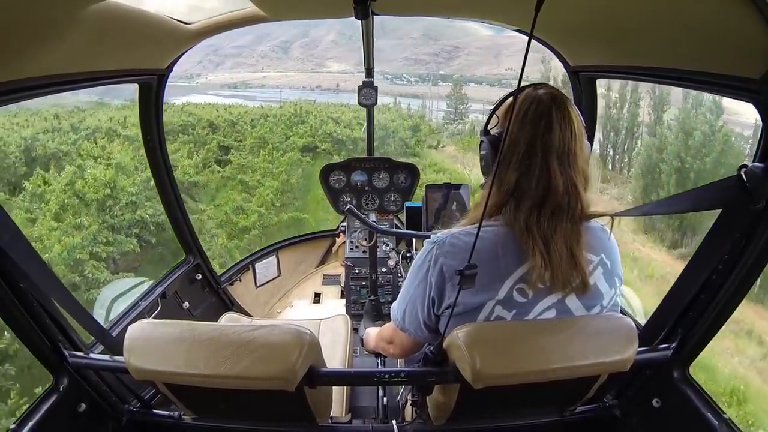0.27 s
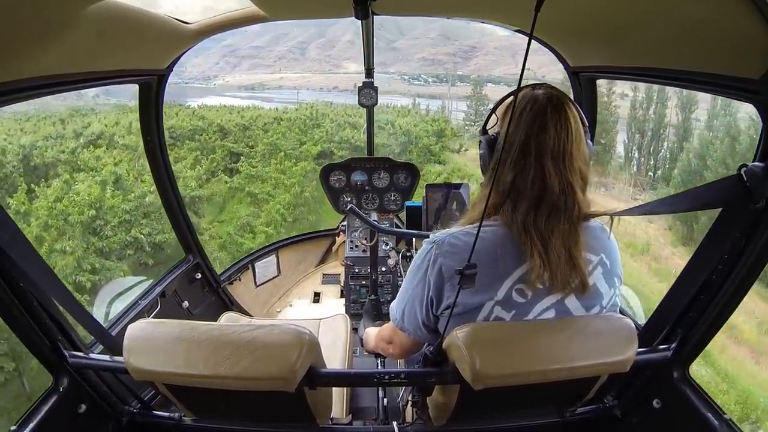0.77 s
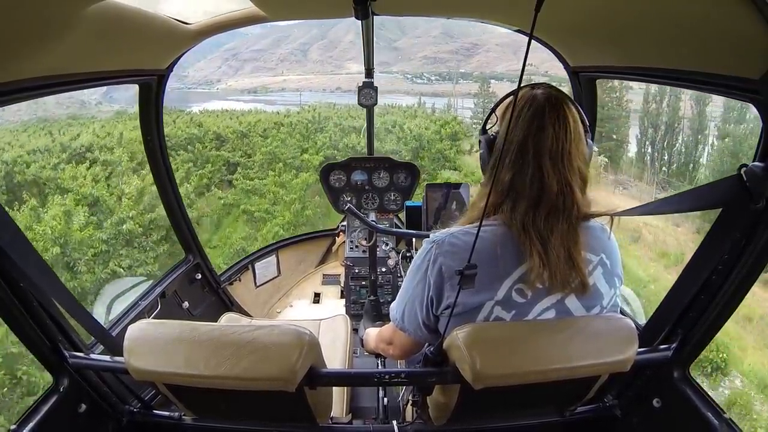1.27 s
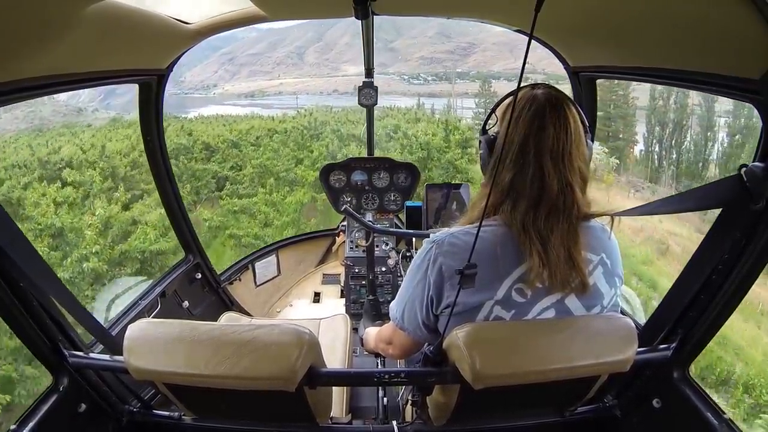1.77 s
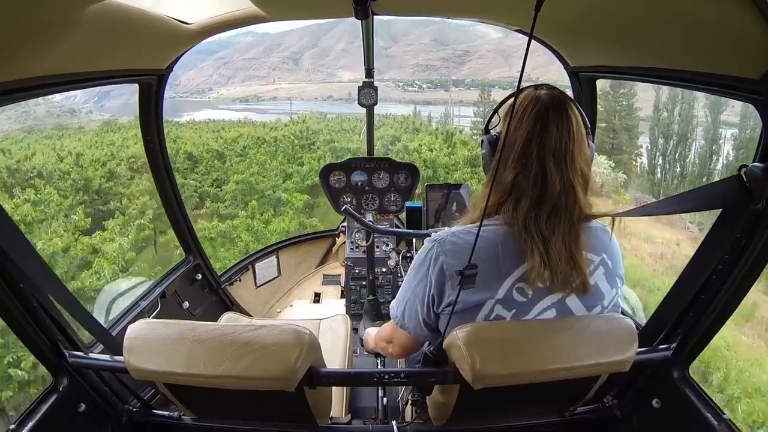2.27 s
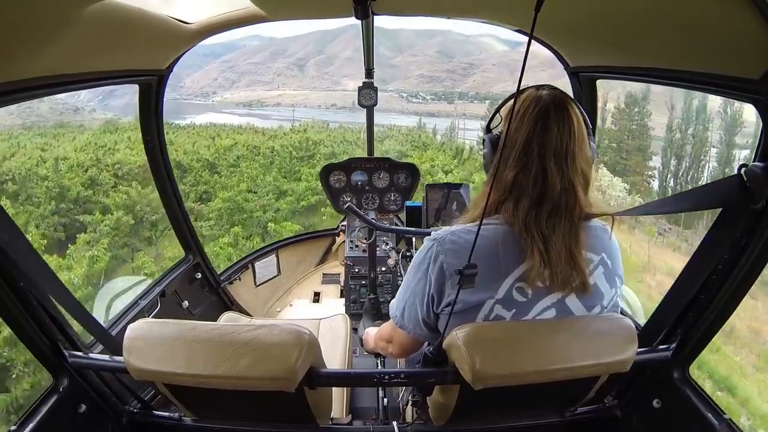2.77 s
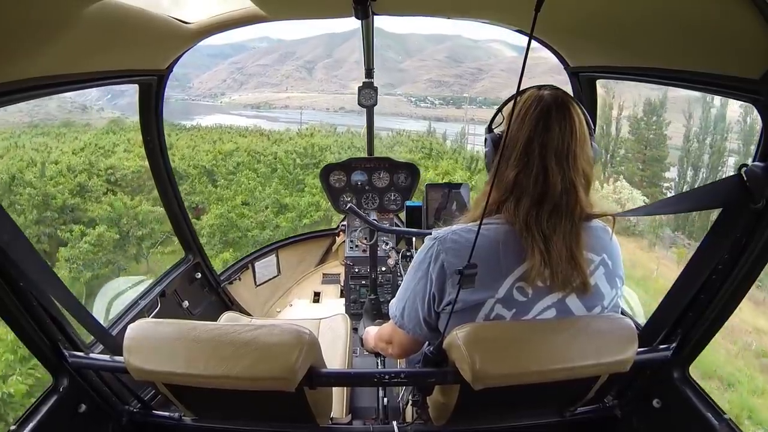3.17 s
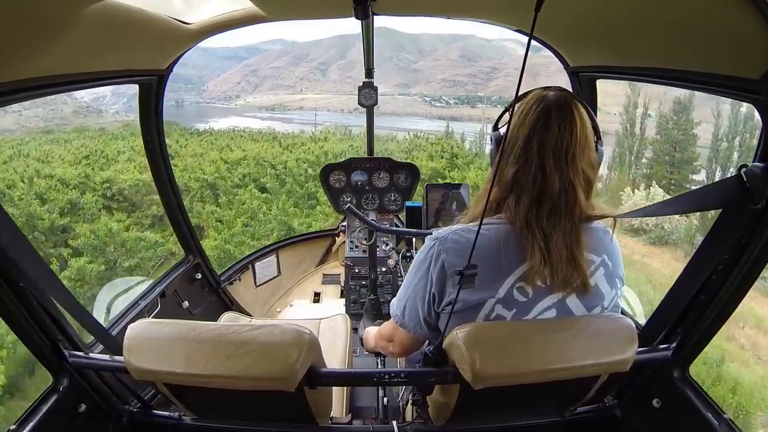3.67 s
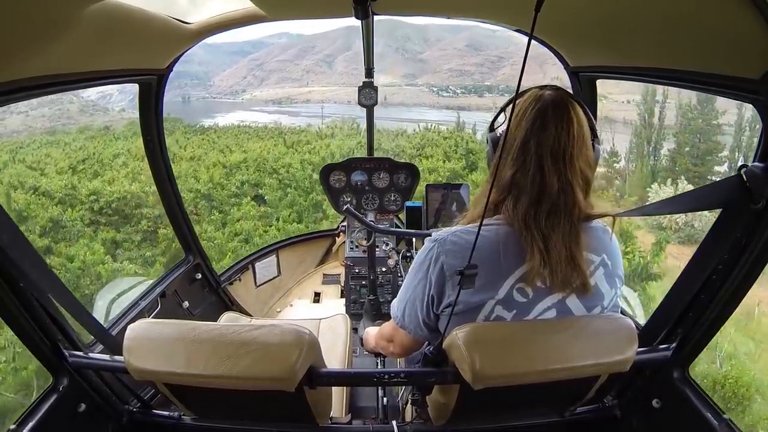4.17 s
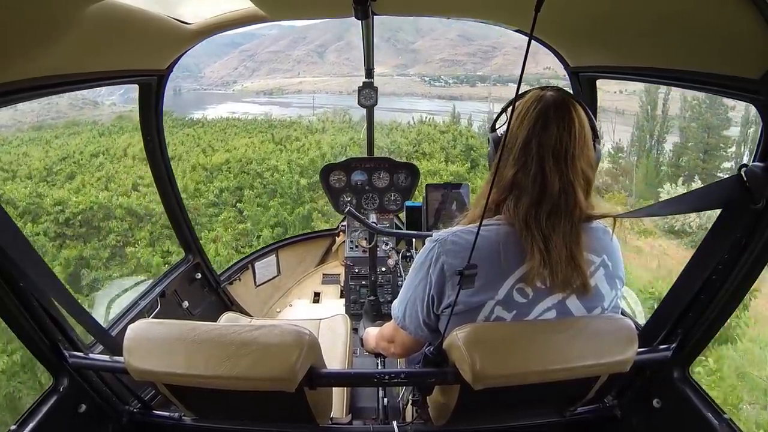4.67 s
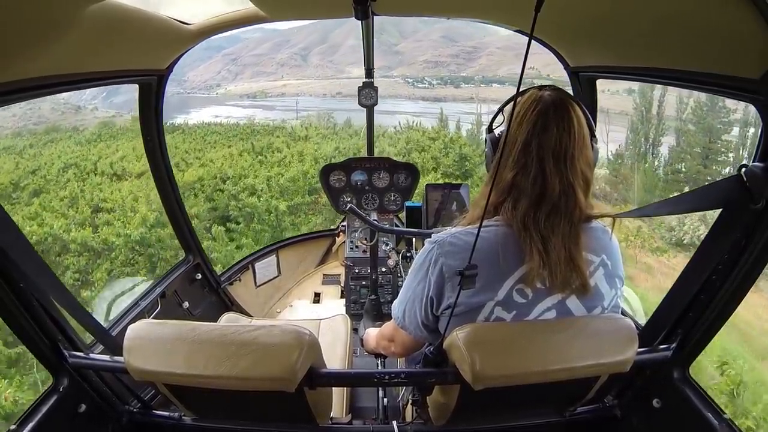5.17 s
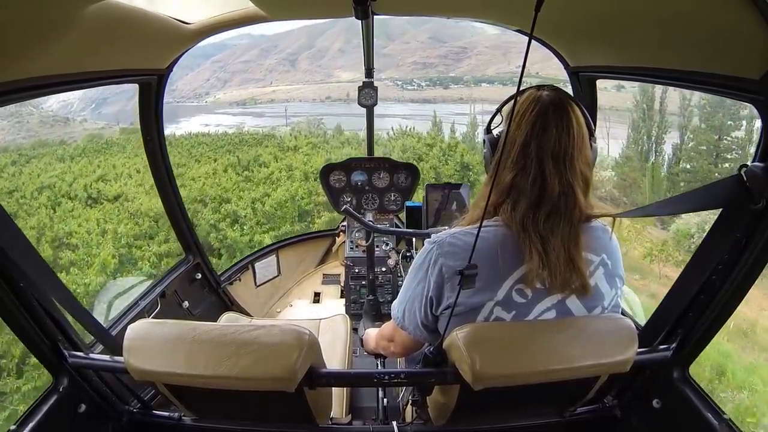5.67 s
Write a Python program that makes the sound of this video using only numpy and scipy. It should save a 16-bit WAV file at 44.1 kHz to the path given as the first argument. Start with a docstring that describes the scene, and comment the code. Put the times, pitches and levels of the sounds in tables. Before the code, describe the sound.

A small piston helicopter in flight, taken through a cable in the cabin. A steady low electrical buzz leads over engine drone, muffled roar and wide even hiss, with a faint high gear whine. A soft knock comes at the start, then sparse dry static clicks; knocks and clicks bunch up in the last second. Almost identical left and right, with no room echo.

```python
"""Inside a small piston helicopter, heard through a cable. From the start an electrical buzz of locked overtones lies
over engine lines, a gear whine and noise-made cabin roar; filtered noise adds hiss and drift to a constant offset.
A panel resonance rings throughout and is knocked from 0.1 s on; the 800 Hz band swells irregularly from 0.2 s.
Static clicks, filtered impulses, snap from 0.5 s; knocks and clicks crowd together in the last second."""
import sys
import numpy as np
from scipy.fft import rfft, irfft, next_fast_len
from scipy.io import wavfile
from scipy.ndimage import map_coordinates

SR = 44100
rng = np.random.default_rng(int(sys.argv[2]) if len(sys.argv) > 2 else 0)


def to_wav(s):
    """Save 16-bit WAV."""
    ch = np.atleast_2d(s).T  # columns
    pcm = np.round(np.clip(ch, -1, 1) * 32767)  # PCM
    wavfile.write(sys.argv[1], SR, pcm.astype(np.int16))


N = 260631
CYCLE_HZ = 22.81  # four-stroke engine cycle


def amp(db):
    """Decibels to gain."""
    return 10 ** (np.asarray(db) / 20)


def unit(x):
    """Scaled to rms 1."""
    return x / np.sqrt(np.mean(x ** 2))


def curves(rows):
    """One value per sample for each column after the time."""
    s, *cols = np.transpose(rows)
    return [np.interp(np.arange(N) / SR, s, c) for c in cols]


def wobble(rate_hz):
    """A smooth random curve through rate_hz knots a second."""
    knots = rng.standard_normal(int(N * rate_hz / SR) + 4)
    return map_coordinates(knots, [np.arange(N) * rate_hz / SR])


def filtered(x, response):
    """x passed through a complex response of frequency."""
    m = next_fast_len(N + SR // 2)
    spectrum = rfft(x, m) * response(np.fft.rfftfreq(m, 1 / SR))
    return irfft(spectrum, m)[..., :N]


def resonance(hz, width_hz):
    """A causal resonant peak of gain 1."""
    return lambda f: 1j * f * width_hz / (hz ** 2 - f ** 2 + 1j * f * width_hz)


def noise(spectrum, channels=1):
    """Noise whose density follows (Hz, dB per Hz) points on a log axis, at -140 dB per Hz above them."""
    hz, db = np.transpose(spectrum)
    gain = lambda f: amp(np.interp(np.log(f + 1), np.log(hz + 1), db, right=-140))
    white = rng.standard_normal((channels, N)) * np.sqrt(SR / 2)
    return filtered(white, gain)


def tone(hz, db, phase=None):
    """A sine of rms db that follows hz, starting anywhere unless a phase is given."""
    phase = rng.uniform(0, 2 * np.pi) if phase is None else phase
    turns = np.cumsum(hz + np.zeros(N)) / SR
    return np.sqrt(2) * amp(db) * np.sin(2 * np.pi * turns + phase)


def kicks(rows):
    """One impulse for each (s, dB) row."""
    train = np.zeros(N)
    s, db = np.transpose(rows)
    train[np.round(s * SR).astype(int)] = amp(db)
    return train


def roar():
    """Turbulent cabin noise that swells in lumps."""
    # Density before the lumps. Each row: frequency in Hz, level in dB per Hz.
    roar_spectrum = [(40, -100), (110, -84), (190, -82), (250, -76.5), (300, -74), (370, -78.5), (410, -75),
                     (460, -76), (560, -82), (670, -81), (730, -85), (1000, -91), (2500, -100)]
    lumps_db = 0.68 * wobble(12) + 0.87 * wobble(40)
    return noise(roar_spectrum)[0] * amp(lumps_db)


def whine():
    """Gear teeth sing one wandering line; a few faint tones stand still."""
    # Mean gear pitch. Each row: time in seconds, frequency in Hz.
    gear_pitch = [(0, 2660), (1.1, 2659), (2, 2649), (2.8, 2646), (3.6, 2655), (4.4, 2663), (5, 2657),
                  (5.91, 2648)]
    # Faint steady tones. Each row: frequency in Hz, rms level in dB.
    steady_tones = [(243.5, -68), (460, -65), (1616.3, -80), (1636.5, -81)]
    gear_db, waver_hz = -73, 4
    hz, = curves(gear_pitch)
    gear = tone(hz + waver_hz * wobble(8), gear_db + 3.5 * wobble(6.6))
    return gear + sum(tone(*row) for row in steady_tones)


def engine():
    """Uneven cylinders give a line at each multiple of the cycle; the governor hunts slightly."""
    # Lines that reach the cabin. Each row: multiple of the cycle, mean level in dB rms.
    cycle_lines = [(5, -77), (6, -68), (9, -69), (11, -71), (12, -67), (13, -66), (15, -62), (16, -70),
                   (17, -70), (19, -61), (20, -69), (22, -70), (24, -74), (26, -77), (30, -79)]
    cycle_hz = CYCLE_HZ * (1 + 0.00067 * wobble(1.56))
    return sum(tone(k * cycle_hz, db + 1.1 * wobble(2.88)) for k, db in cycle_lines)


def panel():
    """A panel resonance driven by noise that pulses at the engine cycle, and by soft knocks."""
    # Panel resonance: frequency in Hz, width in Hz.
    panel_peak = (816, 74)
    # Soft knocks. Each row: time in seconds, impulse level before filtering in dB.
    knock_rows = [(.1042, 0), (1.2865, -8), (5.196, -6), (5.5032, 1.5), (5.58, -6), (5.754, -7), (5.81, -7)]
    shaken_db, cycle_shake_db = -60.5, 3
    ring, thud = resonance(*panel_peak), resonance(800, 500)
    cycle = np.sin(2 * np.pi * CYCLE_HZ * np.arange(N) / SR)
    shake_db = 0.99 * wobble(29.96) + cycle_shake_db * cycle
    shaken = filtered(rng.standard_normal(N) * amp(shake_db), lambda f: ring(f) ** 1.66)
    soft_knock = lambda f: (ring(f) + .35 * thud(f)) / (1 + (1j * f / 1100)) ** 2
    knocked = filtered(-kicks(knock_rows), soft_knock)
    return amp(shaken_db) * unit(shaken) + knocked


def clicks():
    """Each discharge pulls the line down for an instant, then kicks it up; the input rings briefly after it."""
    # Static clicks. Each row: time in seconds, impulse level before filtering in dB.
    click_rows = [(.52453, -7.8), (1.69047, -3.4), (2.79043, -5.3), (3.90637, -5.7), (4.52449, -4.2),
                  (4.82034, -3.3), (5.35489, -4.6), (5.40469, -4.2), (5.54761, -2.6), (5.83829, -4.1)]
    pull_lead_s, lowpass_hz = .00006, 2270
    pull = lambda f: 1 - .32 * np.exp(2j * np.pi * f * pull_lead_s)
    snap, after = resonance(1940, 3050), resonance(640, 185)
    click = lambda f: (pull(f) * snap(f) - .83 * after(f)) / (1 + 1j * f / lowpass_hz)
    return filtered(kicks(click_rows), click)


def buzz():
    """Overtones locked to one steady pitch, spread in phase so the pulse is smeared; their strength flutters."""
    # Overtones except the fifth. Each row: multiple of the pitch, mean level in dB rms.
    overtones = [(1, -66), (2, -47), (3, -50.5), (4, -58.5), (6, -79.5), (7, -77.5), (9, -82), (10, -76),
                 (14, -111), (15, -104), (20, -77)]
    # Listed swells of the narrow 800 Hz band, brief rises in the fifth overtone. Each row: peak time in
    # seconds, added peak level in dB rms.
    swells = [(.239, -54), (.328, -51), (.416, -51), (.633, -54), (.729, -73), (.895, -52), (.982, -56),
              (1.202, -67), (1.509, -51), (2.165, -48), (2.523, -50), (2.607, -52), (3.018, -46),
              (3.263, -53), (3.803, -53), (4.982, -53), (5.024, -54), (5.2, -50), (5.278, -49),
              (5.375, -51), (5.512, -52), (5.582, -49), (5.682, -55)]
    buzz_hz, fifth_db = 160.025, -59.5
    swell_s = 0.01  # from peak to 1/e
    flutter_db = .35 * wobble(25)  # common to all but the fifth
    smear = lambda k: 1.1 * k * k  # radians
    steady = sum(tone(k * buzz_hz, db + flutter_db + 0.84 * wobble(5.25), smear(k)) for k, db in overtones)
    t = np.arange(N) / SR
    swell_gain = sum(amp(db) * np.exp(-((t - s) / swell_s) ** 2) for s, db in swells)
    fifth_gain = amp(fifth_db + 1.5 * wobble(12)) + swell_gain
    fifth = tone(5 * buzz_hz, 0, smear(5) + .3 * wobble(20))
    return steady + fifth_gain * fifth


def scene():
    """One cable feeds both channels alike."""
    line = roar() + whine() + engine() + panel() + clicks() + buzz()
    return np.array([line, line])


def record(dry):
    """The input stage adds hiss and a drifting offset, and keeps no sound above its band limit."""
    # Hiss common to both channels. Each row: frequency in Hz, level in dB per Hz.
    hiss_spectrum = [(200, -88.5), (1000, -94.5), (2500, -91.5), (6000, -92.5), (11000, -93),
                     (15000, -92.5)]
    # Drift of each channel alone. Each row: frequency in Hz, level in dB per Hz.
    drift_spectrum = [(3, -65), (20, -75), (60, -75), (115, -84.5), (190, -93.5), (300, -99), (420, -101),
                      (520, -125)]
    # Constant offset. Each row: one channel's offset, full scale 1.
    channel_offset = [
        [.264],
        [.2435],
    ]
    top_hz = 15280
    hiss = noise(hiss_spectrum + [(SR / 2, -92)])
    wet = dry + hiss + noise(drift_spectrum, channels=2)
    return filtered(wet, lambda hz: hz < top_hz) + channel_offset


dry = scene()
out = record(dry)
to_wav(out)
```